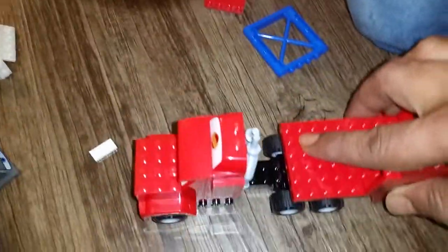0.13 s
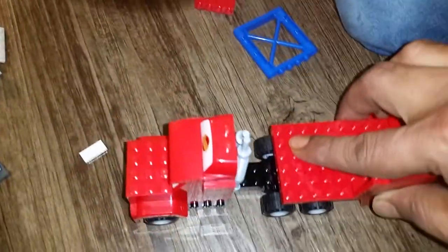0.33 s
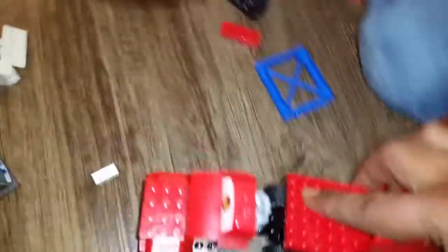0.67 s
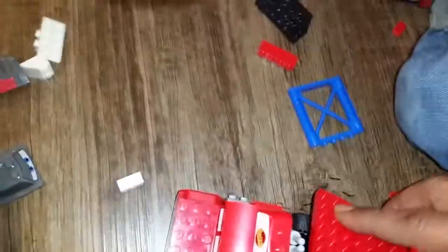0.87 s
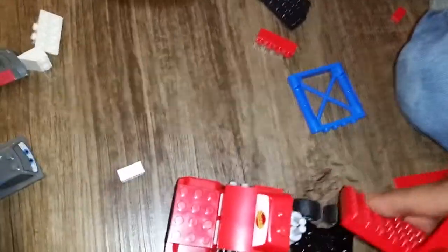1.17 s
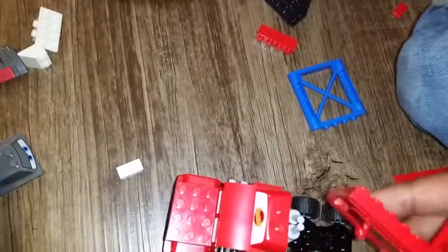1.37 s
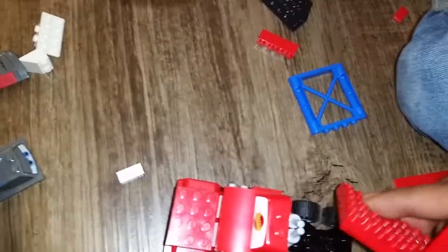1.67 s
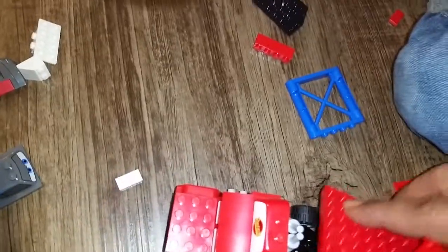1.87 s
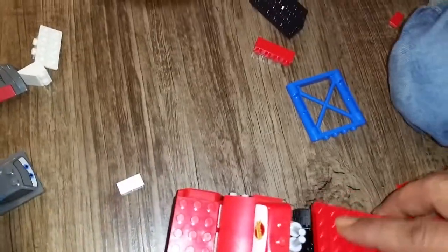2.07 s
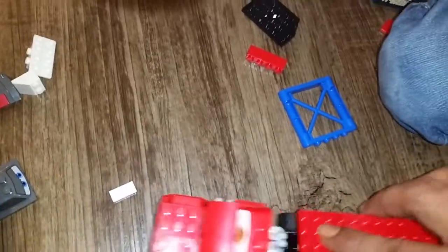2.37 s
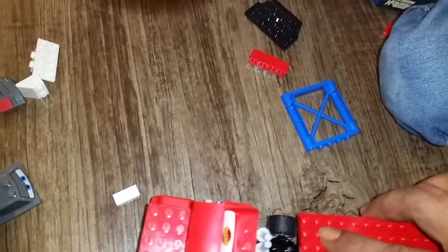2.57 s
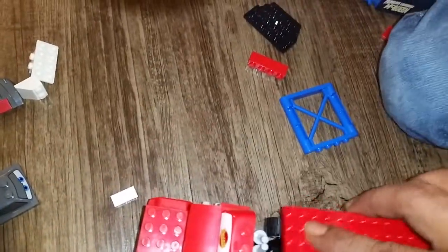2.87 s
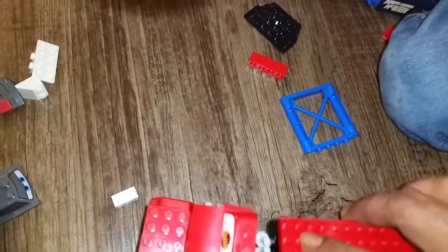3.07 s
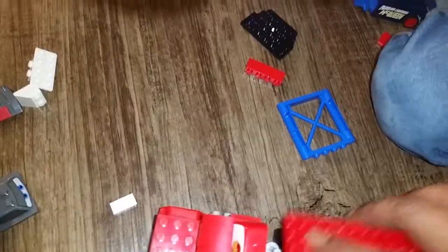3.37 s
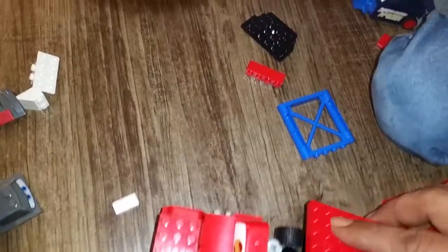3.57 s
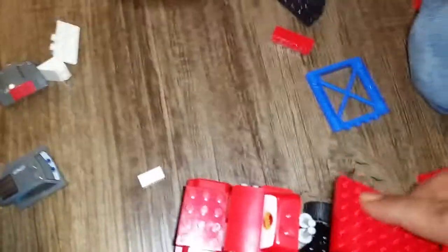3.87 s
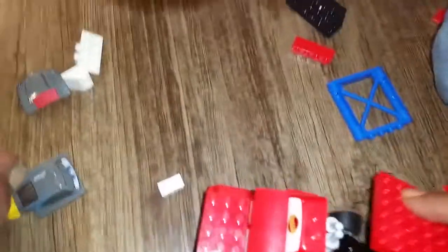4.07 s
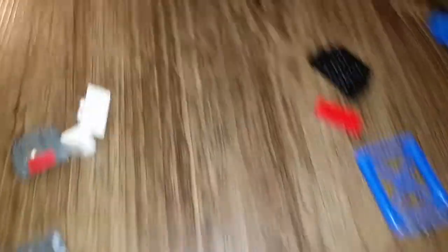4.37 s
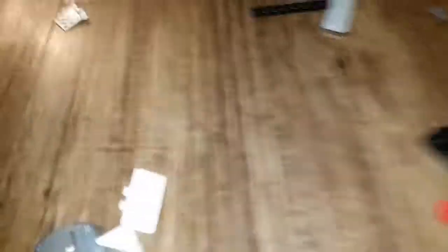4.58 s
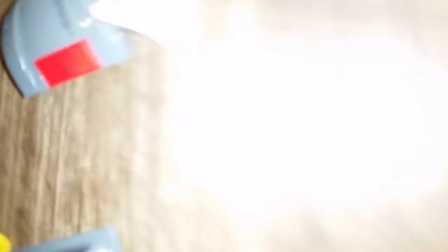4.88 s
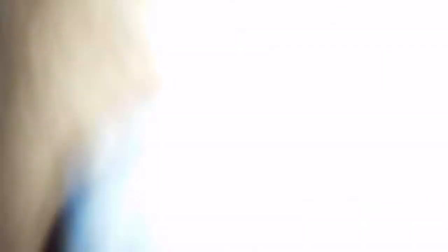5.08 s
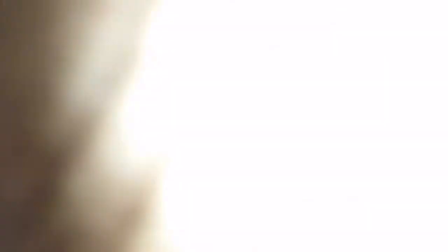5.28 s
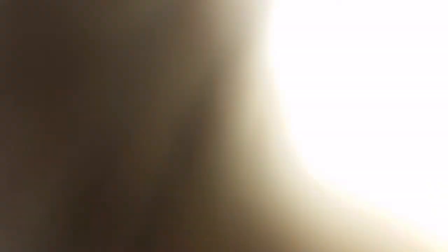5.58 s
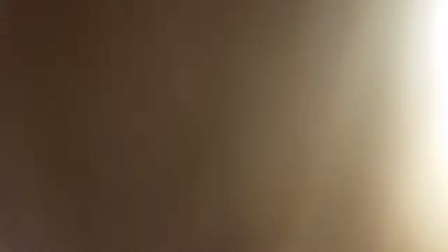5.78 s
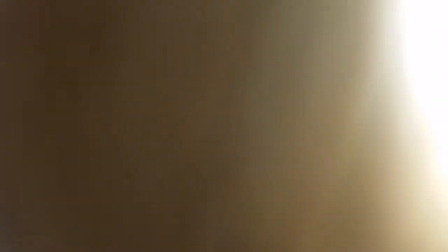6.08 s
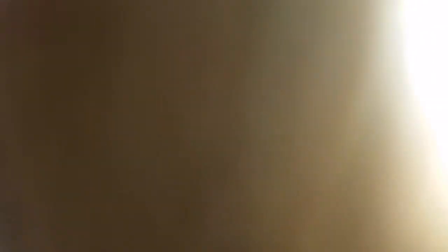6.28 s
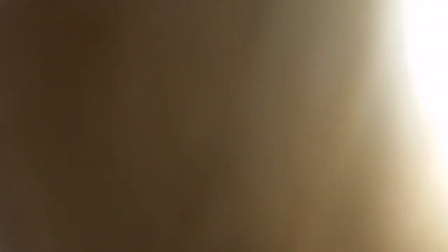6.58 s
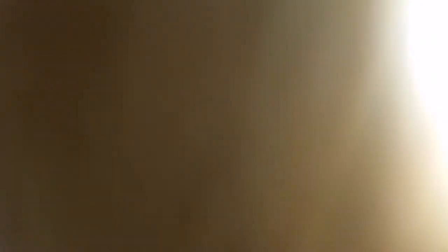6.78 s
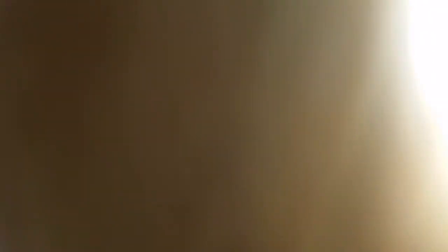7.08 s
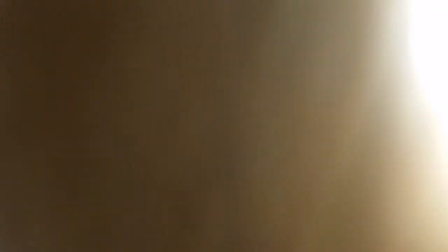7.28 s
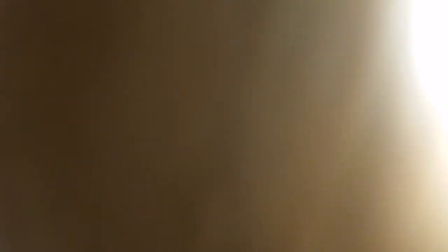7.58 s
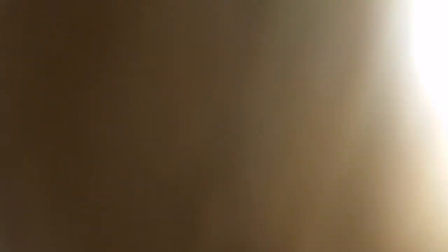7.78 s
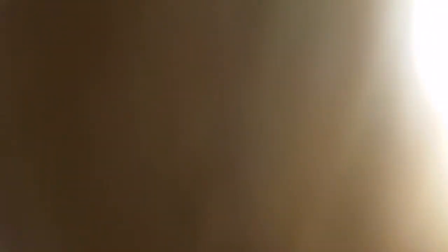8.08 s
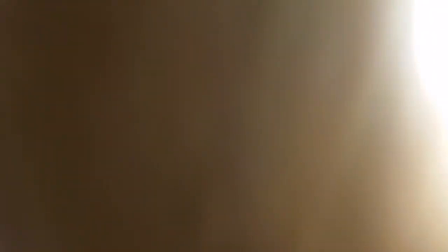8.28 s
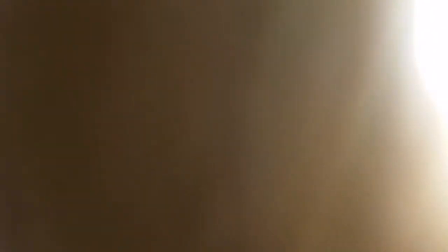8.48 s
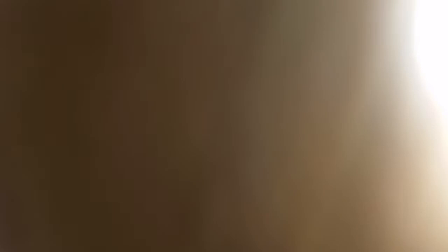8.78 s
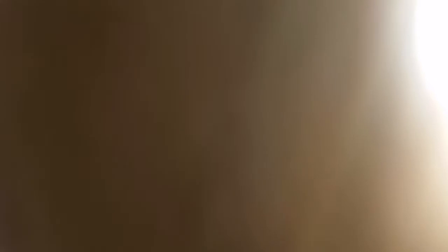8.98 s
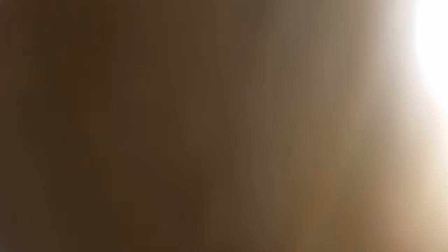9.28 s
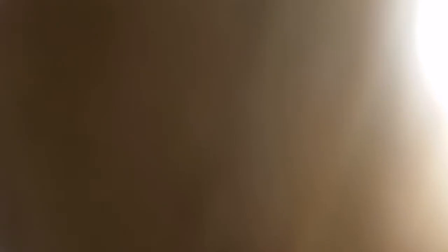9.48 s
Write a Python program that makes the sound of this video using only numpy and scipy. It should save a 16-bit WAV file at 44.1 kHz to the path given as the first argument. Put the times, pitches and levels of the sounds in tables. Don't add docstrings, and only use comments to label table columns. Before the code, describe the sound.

Hollow plastic clacks and a bright tinkling part, a huge close thump with bouncing, a muffled lull, then a dense rattle of small bricks.

```python
import sys
import numpy as np
from scipy import signal
from scipy.fft import rfft, irfft, next_fast_len
from scipy.io import wavfile
from scipy.ndimage import uniform_filter1d

SR = 44100
rng = np.random.default_rng(int(sys.argv[2]) if len(sys.argv) > 2 else 0)


def amplitude_ratio(level_db):
    exponent = np.asarray(level_db, float) / 20
    return 10 ** exponent


def transcribe(u):
    v = np.clip(np.atleast_2d(u).T, -1, 1)
    q = np.round(v * 32767).astype(np.int16)
    wavfile.write(sys.argv[1], SR, q)


N = 425124
T = np.arange(int(0.3 * SR)) / SR

# t/s, gain/dB
GAIN = [
    (5.2, 2),
    (5.23, -4),
    (5.6, -15.5),
    (6.0, -13),
    (6.5, -18),
    (6.95, -10.5),
    (7.1, -2),
    (7.5, 1),
    (7.9, 2),
]


def level(x, db):
    return x * amplitude_ratio(db) / np.sqrt(np.mean(x ** 2))


def along(table):
    s, *columns = np.transpose(table)
    return [np.interp(np.arange(N) / SR, s, c) for c in columns]


def walk(rate):
    k = int(SR / rate)
    held = rng.standard_normal(1000)[np.arange(N) // k]
    return 2.75 * uniform_filter1d(uniform_filter1d(held, k), k)


def panned(pan_db):
    return amplitude_ratio(np.array([[pan_db], [-pan_db]]) / 2)


def band(x, hz, width_hz):
    edges = np.clip([hz - width_hz / 2, hz + width_hz / 2], 15, 18000)
    return signal.sosfilt(signal.butter(2, edges, "bandpass", fs=SR, output="sos"), x)


def coloured(points, alike):
    top_hz = 14550
    hz, db = np.transpose(points)
    f = np.maximum(np.fft.rfftfreq(N, 1 / SR), 1)
    shape = amplitude_ratio(np.interp(np.log(f), np.log(hz), db, left=-90, right=-90)) * (f < top_hz)
    mid, side = irfft(rfft(rng.standard_normal((2, N))) * shape, N)
    sides = side * np.array([[1], [-1]])
    return level(np.sqrt(1 + alike) * mid + np.sqrt(1 - alike) * sides, 0)


def ring(hz, db, t60):
    t60 = max(t60, 0.003)
    t = T[:int(1.5 * t60 * SR)]
    tone = amplitude_ratio(db) * np.sin(2 * np.pi * hz * t) * np.exp(-np.log(1000) * t / t60)
    return np.pad(tone, (0, len(T) - len(t)))


def add(out, s, sound, db, pan_db, lag_s):
    sound = np.ones((2, 1)) * sound * amplitude_ratio(db) / np.max(np.abs(sound))
    for ear, sign in enumerate((1, -1)):
        i = int((s + lag_s * (1 - ear)) * SR)
        out[ear, i:i + len(T)] += (sound[ear] * amplitude_ratio(sign * pan_db / 2))[:N - i]


def chatter(sound, length_s):
    noise = rng.standard_normal(len(T))
    blows = noise * (np.abs(noise) > 2.4) * np.exp(-T / length_s) / 4
    blows[0] = 1
    return signal.fftconvolve(sound, blows[:int(6 * length_s * SR) + 1])[:len(T)]


def clicks(table, t60, up_lift_db, crowd_db, crack_db, crack_hz, crack_s, chatter_s, lag_s, trim_db, rise_s):
    out = np.zeros((2, N))
    for s, db, low_hz, up_hz, up_db, pan_db in table:
        up_db = up_db + up_lift_db
        up_hz = up_hz * (1 + 0.027 * rng.standard_normal())
        sound = ring(low_hz, 0, t60) + ring(up_hz, up_db, 0.79 * t60)
        for k in range(8):
            near_hz = (low_hz, up_hz)[k % 2] * np.exp(0.23 * rng.standard_normal())
            near_db = crowd_db + up_db * (k % 2) + 3 * rng.standard_normal()
            sound = sound + ring(min(near_hz, 16000), near_db, 0.49 * t60)
        grit = band(rng.standard_normal(len(T)), crack_hz, 1.4 * crack_hz)
        sound = sound + amplitude_ratio(crack_db) * grit * np.exp(-T / crack_s)
        sound = chatter(sound, chatter_s) * (1 - np.exp(-(T / rise_s) ** 2))
        add(out, s - rise_s / 2, sound, db + trim_db, pan_db, lag_s)
    return out


def taps(table, modes, crack_db, crack_hz, vary_db, trim_db, pan_db):
    out = np.zeros((2, N))
    for s, db in table:
        sound = sum(ring(hz, mode_db + vary_db * rng.standard_normal(), t60) for hz, mode_db, t60 in modes)
        grit = band(band(rng.standard_normal(len(T)), crack_hz, 5000), crack_hz, 5000)
        sound = sound + amplitude_ratio(crack_db) * grit * np.exp(-T / 0.0013)
        add(out, s, sound, db + trim_db, pan_db, 0.0004)
    return out


def rubs(table, pan_db):
    out, t = np.zeros((2, N)), np.arange(N) / SR
    noise = rng.standard_normal((2, N))
    for s, length_s, hz, width_hz, db in table:
        i = np.abs(t - s) < length_s
        swell = np.exp(-(2 * (t[i] - s) / length_s) ** 2)
        friction = band(band(noise[:, i], hz, 1.4 * width_hz), hz, 1.4 * width_hz)
        out[:, i] += level(friction, db) * swell
    return out * panned(pan_db)


def thumps(table, panel_t60, case_db, rebound_db, side_t60):
    out = np.zeros((2, N))
    for s, db, hz, pan_db in table:
        push = np.exp(-((T * hz - 0.2) / 0.071) ** 2)
        panel = ring(hz, 0, panel_t60) + ring(267, -1.5, 0.034)
        case = ring(387, -0.5, 0.019) + ring(490, -6.5, 0.015) + ring(700, -5, 0.015) + ring(1000, -5.5, 0.02)
        body = -signal.fftconvolve(panel + amplitude_ratio(case_db) * case, push / push.sum())[:len(T)]
        rebound = amplitude_ratio(rebound_db) * np.exp(-((T * hz - 0.62) / 0.14) ** 2)
        add(out, s - 0.001, body + rebound, db, pan_db, 0.0003)
        add(out, s, ring(1.2 * hz, 0, side_t60) * np.array([[1], [-1]]), db - 8.5, 0, 0)
    return signal.sosfilt(signal.butter(2, 75, "highpass", fs=SR, output="sos"), out)


def hum():
    # f/Hz, level/dB
    line_table = [(96.9, -59), (118.4, -54), (166.9, -52), (629.8, -64.5), (1080, -68)]
    # f/Hz, density/dB per Hz
    rumble_colour = [(12, -51), (20, -17), (70, -6), (108, -7), (140, -3.5), (168, -1), (291, -2.5),
                     (420, -12), (552, -11.5), (640, -9.5), (727, -15), (1310, -21.5), (1600, -51.5),
                     (2080, -132), (3520, -120)]
    rumble_db = -47
    t = np.arange(N) / SR
    lines = 0
    for hz, db in line_table:
        wobble = np.sin(2 * np.pi * (hz * t + 0.13 * walk(3)))
        lines = lines + amplitude_ratio(db + 2.0 + 0.42 * walk(4.8)) * wobble
    rumble = coloured(rumble_colour, 0.77) * amplitude_ratio(rumble_db - 1.0 + 1.07 * walk(3.018))
    return (lines + rumble) * amplitude_ratio(np.array([[-0.7], [0.7]]) + along(GAIN)[0])


def rustle():
    # t/s, rustle level/dB
    motion = [(0, -48.5), (.3, -47.5), (.96, -53), (1.2, -48), (2.1, -47), (2.45, -48.5), (3.4, -46.5),
              (3.78, -47), (4.2, -47), (4.67, -51), (5.1, -48), (7.1, -48.5), (7.22, -43), (7.6, -43),
              (8.1, -48), (8.78, -49.5), (9.05, -50), (9.64, -50)]
    # f/Hz, density/dB per Hz
    soft_colour = [(410, -5), (700, -4), (1180, -0.5), (1330, -1), (1700, 0), (3480, 5), (5500, -19.5),
                   (7150, -40.5), (12100, -120)]
    crisp_colour = [(1760, -9), (3000, -3), (3490, -7), (4010, -1), (7420, -1.5), (9000, -6.5),
                    (11700, -90), (19800, -120)]
    air_colour = [(5290, -5), (9000, -2.5), (10200, -0.5), (14300, -0.5)]
    soft_sink, air_sink = 0.3, 2.2
    gain_db = along(GAIN)[0]
    lowered_db = np.minimum(gain_db, 0)
    busy_db = along(motion)[0] + gain_db
    pan_db = -9.5 * np.array([[0.5], [-0.5]])

    soft_db = busy_db - 0.43 + soft_sink * lowered_db + walk(21) + 0.5 * walk(3.4)
    soft = coloured(soft_colour, 0.014) * amplitude_ratio(soft_db + np.array([[1.1], [-1.1]]))
    crisp = coloured(crisp_colour, 0.046) * amplitude_ratio(busy_db + 0.27 + walk(25) + pan_db)
    air_db = 0.6 * busy_db - 22.5 + air_sink * lowered_db + 0.27 * walk(35)
    air = coloured(air_colour, 0.03) * amplitude_ratio(air_db + 0.16 * pan_db)
    return soft + crisp + air


def cloth_rubs():
    strokes = [(1.31, 0.1, 2900, 2500, -43), (1.62, 0.21, 684, 266, -44.5), (1.62, 0.36, 5900, 6750, -39.5),
               (2.242, 0.12, 8250, 2040, -34.5), (2.66, 0.38, 2310, 2470, -41),
               (3.764, 0.1, 6900, 4500, -43), (4.17, 0.17, 3370, 2480, -44.5),
               (5.095, 0.19, 7000, 7740, -37), (6.12, 0.11, 5460, 3000, -52), (6.74, 0.12, 6000, 5000, -68),
               (7.955, 0.1, 3120, 2390, -36.5), (8.78, 0.48, 3670, 5360, -40.5),
               (9.384, 0.13, 5570, 2500, -44)]
    return rubs(strokes, pan_db=-6)


def grips():
    holds = [
        (4.6, 0.96, 40, 43, -52),
        (5.41, 0.17, 220, 248, -40),
        (5.46, 0.043, 497, 503, -43),
        (5.65, 0.21, 200, 286, -37),
        (5.897, 0.014, 510, 217, -21.5),
        (6.01, 0.12, 69, 89, -46),
    ]
    return rubs(holds, pan_db=6)


def cracks():
    # t/s, peak/dB, treble/dB re peak, left minus right/dB, body f/Hz
    contacts = [(5.207, -2, -4, -17, 1200), (5.28, -36, -25, -14, 1500), (5.361, -16, 4, 13.5, 1720),
                (5.429, -27.5, -17, 9, 900), (5.4435, -12.5, -24, 13.5, 770), (5.602, -37.5, 6, 9, 900),
                (5.66, -28, -13, 16, 890), (5.6696, -8, 0.5, 12.5, 1260), (5.6727, -13.5, 7.5, 8.5, 1950),
                (5.691, -22, -13, 13.5, 1290), (5.714, -14, 1, 13, 1190), (5.7225, -22.5, 4, 13, 1200),
                (5.7337, -14.5, -5, 16, 1480), (5.74, -23, -12, 16, 1500), (5.7438, -18, -7, 17, 1080),
                (5.81, -21, -5, 15.5, 910), (5.827, -29, -18, 16, 700), (5.861, -29, -2, 14, 1600),
                (5.882, -17.5, -3, 13, 1230), (5.8874, -20, -7, 11, 700), (5.922, -35, -10, 13, 1090)]
    out = np.zeros((2, N))
    for s, db, top_db, pan_db, hz in contacts:
        dull, bright = rng.standard_normal((2, len(T)))
        body = band(dull * np.exp(-(T / 0.0028) ** 2), hz, 1.03 * hz)
        edge = amplitude_ratio(top_db - 14.5) * band(bright * np.exp(-(T / 0.002) ** 2), 3800, 2600)
        spark = amplitude_ratio(top_db - 20) * band(bright * np.exp(-(T / 0.0018) ** 2), 8000, 3500)
        add(out, s, body + edge + spark, db, pan_db, 0.0003)
    return out


def landing():
    # t/s, peak/dB, f/Hz, left minus right/dB
    slam = [
        (5.2075, 12.5, 167, -0.5),
    ]
    # t/s, peak/dB, f/Hz, left minus right/dB
    floor_thumps = [(4.267, -34, 101, 17), (4.431, -44, 175, 33), (4.651, -27, 101, 18), (5.222, -4, 172, 3.5),
                    (5.239, -5, 183, 4.5), (5.256, -5.5, 201, 1.5), (5.28, -6, 229, 2.5),
                    (5.293, -13, 207, -2.5), (5.324, -27, 210, 0), (5.3605, -14.5, 153, -1),
                    (5.3655, -5.5, 168, -2), (5.429, -20.5, 121, -19), (5.444, -18, 234, 21),
                    (5.47, -21.5, 133, 9), (5.553, -33.5, 222, 29), (5.61, -37, 198, 18),
                    (5.717, -19, 128, 34.5), (5.726, -10.5, 295, 20), (5.732, -11.5, 320, 23.5),
                    (5.74, -9, 170, 18.5), (5.758, -21.5, 232, 19), (5.811, -12, 157, 28), (5.826, -18, 129, 32),
                    (5.844, -15.5, 100, 8), (5.864, -10.5, 103.6, 13), (5.882, -19, 198, 11),
                    (5.888, -17, 302, 13), (5.898, -21, 150, 12), (5.917, -24.5, 152, 17),
                    (5.939, -21.5, 98, 12), (8.751, -24, 377, 2), (8.844, -28.5, 310, 4)]
    out = thumps(slam, panel_t60=0.035, case_db=3.5, rebound_db=-8.5, side_t60=0.032)
    return out + thumps(floor_thumps, panel_t60=0.088, case_db=-1.5, rebound_db=-2.0, side_t60=0.1)


def case_ticks():
    # t/s, peak/dB
    touches = [
        (5.7631, -13),
        (5.7847, -20.5),
        (5.789, -24.5),
        (5.798, -30),
        (5.8025, -29),
    ]
    # f/Hz, level/dB, t60/s
    modes = [(2495, -3.5, 0.057), (3750, -3, 0.037), (4640, -23, 0.031), (5760, -6.5, 0.029),
             (6350, -13, 0.028), (6971, -23, 0.023), (7547, -7, 0.026), (9700, -11.5, 0.011)]
    return taps(touches, modes, crack_db=3, crack_hz=6000, vary_db=2.5, trim_db=-4, pan_db=9)


def bead():
    # t/s, peak/dB
    touches = [(6.5485, -46.5), (6.5984, -40), (6.6238, -38), (6.6357, -42), (6.665, -44), (6.6735, -41.5),
               (6.7057, -36), (6.7463, -41.5), (6.7674, -39.5), (6.7323, -55), (6.779, -51), (6.7914, -44),
               (6.8536, -55)]
    # f/Hz, level/dB, t60/s
    modes = [(5430, 0, .022), (5480, -25, .35), (7800, -14, .05), (10150, -28, .03), (12800, -32, .04)]
    return taps(touches, modes, crack_db=3, crack_hz=5000, vary_db=1, trim_db=2.5, pan_db=-17)


def released_plate():
    # t/s, peak/dB
    touches = [
        (6.13, -52),
        (6.162, -50),
    ]
    # f/Hz, level/dB, t60/s
    modes = [(2774, -2, .45), (7610, -3, .25)]
    return taps(touches, modes, crack_db=-3, crack_hz=5000, vary_db=5.0, trim_db=-0.5, pan_db=-7)


def ticks():
    # t/s, peak/dB, main f/Hz, upper f/Hz, upper level/dB re main
    touches = [(3.475, -18, 4200, 6200, -8), (3.498, -16.5, 4200, 6140, -5),
               (4.9727, -15.5, 3950, 7100, 26), (5.0584, -8.5, 2860, 8000, 5),
               (5.335, -21.5, 3440, 7530, 1), (5.8452, -24, 4360, 7700, -15), (5.899, -32, 4340, 7800, -2),
               (6.043, -39, 3010, 5330, -11), (6.062, -30, 3240, 7450, -9),
               (6.0823, -25.5, 2350, 7340, -20), (6.116, -38, 5500, 10000, -14),
               (6.13, -33.5, 5550, 8000, -13), (6.1615, -33, 2790, 7610, -8.5),
               (8.5997, -15.5, 4190, 6520, 8)]
    rows = [(*row, -10) for row in touches]
    return clicks(rows, t60=0.028, up_lift_db=8.5, crowd_db=-5.5, crack_db=3, crack_hz=5500, crack_s=0.0012,
                  chatter_s=0.0042, lag_s=0.0003, trim_db=-4.0, rise_s=0.0003)


def scrapes():
    drags = [(2.623, 0.041, -29, 1640, 6), (3.183, 0.1, -26, 2280, 8), (2.17, .04, -27, 1800, 3),
             (3.47, 0.087, -35, 1180, 5), (5.69, 0.03, -32, 1500, 14), (5.712, 0.042, -26, 1750, 13),
             (2.471, 0.061, -34.5, 2560, 15), (4.41, 0.14, -47, 2240, 17.5), (6.012, 0.049, -44, 1900, -6),
             (6.04, 0.095, -38, 2300, -6), (6.1, 0.11, -43, 2640, -11), (.842, 0.047, -42, 2430, 12)]
    out = np.zeros((2, N))
    slips = (rng.random(N) < 2200 / SR) * rng.standard_normal(N) + 0.031 * rng.standard_normal(N)
    for s, length_s, db, hz, pan_db in drags:
        i = np.arange(int(s * SR), int((s + length_s) * SR))
        body = ring(hz, 0, 0.011) + ring(1.25 * hz, -1.2, 0.0048)
        body = body + ring(2320, -18, 0.03) + ring(2800, -24, 0.08) + ring(2960, -11.5, 0.0084)
        swell_db = np.interp(np.linspace(0, 1, len(i)), [0, 0.34, 1], [-12, 0, -13])
        sound = signal.fftconvolve(slips[i] * amplitude_ratio(swell_db), body)
        sound = sound * amplitude_ratio(db + 8.5) / np.max(np.abs(sound))
        out[:, i[0]:i[0] + len(sound)] += sound * panned(pan_db)
    return out


def crackle():
    busy = np.interp(np.arange(N) / SR, [7.03, 7.05, 7.2, 7.5, 7.75], [0.0, 0.7, 0.0, 0.84, 0.0])
    tap_db = np.minimum(3.5 * rng.exponential(size=N), 7)
    contacts = (rng.random(N) < 450 / SR) * amplitude_ratio(tap_db) * busy
    grain = rng.standard_normal(len(T)) * np.exp(-T / 0.00069)
    grain = grain + ring(7800, -2, 0.012) + ring(6150, -3, 0.008) + ring(1750, -12, 0.02)
    return signal.fftconvolve(contacts, grain)[:N] * amplitude_ratio(np.array([[-54], [-40]]))


def loose_bits():
    # t/s, peak/dB, main f/Hz, upper level/dB re main
    rattle = [(7.043, -22, 6870.0, -13), (7.046, -20, 6140, -9.4), (7.0504, -19, 6100, -13),
              (7.0926, -19, 6000, -2.1), (7.1736, -21, 6140.0, -13), (7.1857, -16, 5470.0, -7),
              (7.1899, -12.9, 6090.0, 3.2), (7.1951, -10.6, 7200, 13), (7.2005, -14, 7200, 9),
              (7.2106, -17, 7060.0, 3), (7.232, -17, 3360.0, 2.4), (7.2383, -13, 5500, 4),
              (7.2464, -21.2, 3700, 1), (7.2516, -17, 3140.0, 8), (7.2823, -16, 5860, -2.6),
              (7.2907, -11, 6850.0, 20), (7.3037, -24, 3250, 3), (7.3131, -14, 7000, -7),
              (7.349, -18.9, 4220, -11), (7.3586, -24.5, 2560, -5), (7.3772, -19, 5450.0, -0.9),
              (7.3844, -15, 5550, -0.9), (7.4132, -19, 4220.0, -7), (7.4164, -16, 3840, -4.7),
              (7.4198, -4.5, 5800, 4.0), (7.4254, -9.5, 7080.0, 16), (7.4441, -24, 7040, 1.5),
              (7.4539, -22, 4370.0, -6.7), (7.4623, -12, 5430, -13.0), (7.4666, -13.5, 4800.0, -14),
              (7.4718, -15, 4670, -4), (7.4796, -9.5, 5430.0, -9.7), (7.4871, -19, 4830, -27),
              (7.493, -26, 4760.0, -4), (7.511, -17, 5470.0, -5.5), (7.5141, -8, 4400, 2.5),
              (7.5343, -23.5, 3290.0, -6.3), (7.539, -19.2, 3500, -1.3), (7.5426, -21, 6290.0, -6.8),
              (7.548, -12.5, 6140, -5), (7.559, -18, 5170.0, -2), (7.5807, -22, 3530.0, -6.8),
              (7.593, -14.5, 3750, -8), (7.5957, -18, 3640, -2), (7.6001, -19.5, 4170, -8),
              (7.6156, -21, 3840, -2), (7.6298, -23, 2560.0, -2), (7.65, -15.5, 6120.0, -2),
              (7.6646, -19, 4640, -5.9), (7.6882, -22, 6220.0, -17)]
    up_hz, pan_db = 7810, -14
    rows = [(s, db, hz, up_hz, up_db, pan_db) for s, db, hz, up_db in rattle]
    return clicks(rows, t60=0.013, up_lift_db=0.0, crowd_db=-13, crack_db=5, crack_hz=7000, crack_s=0.0006,
                  chatter_s=0.0035, lag_s=0.0004, trim_db=-2.5, rise_s=0.0002)


def chimes():
    # t/s, peak/dB, low note/dB re peak, top notes/dB re peak, left minus right/dB
    strikes = [
        (2.554, -23, -17.5, -27, -15.5),
        (2.6924, -33.5, -6, 1, -10.5),
        (2.7093, -21.5, -12, -11, -4.5),
        (2.7681, -20.5, -16, -9.5, 9.5),
        (2.8378, -6.5, -43, -25, -1),
        (2.8606, -10, -22.5, 18, -6),
        (2.8704, -12.5, -22, -5.5, -13),
        (2.9385, -11.5, -14, 6, -6),
        (2.9445, -27, -15, 8, -7),
        (2.983, -26, -15, 5.5, -8),
    ]
    # f/Hz, level/dB, t60/s
    modes = [(2250, -2.5, 0.11), (4715, 4.5, 0.029), (5280, -7, 0.17), (6700, -15.5, 0.077),
             (6740, -9.5, 0.03), (8250, -17.5, 0.045), (9520, -16, 0.035), (13700, -21, .025)]
    out = np.zeros((2, N))
    for s, db, low_db, top_db, pan_db in strikes:
        noise = rng.standard_normal((len(modes), len(T)))
        sound = amplitude_ratio(8) * band(noise[0], 6000, 10000) * np.exp(-T / 0.0035)
        for (hz, mode_db, t60), n in zip(modes, noise):
            mode_db = mode_db + 2.5 * rng.standard_normal()
            if hz < 3000:
                mode_db += low_db + 24.0
            elif hz > 6000:
                mode_db += top_db + 26.5
            steady, depth, smooth = (0.65, 0.25, 500) if hz < 6000 else (0.15, 0.55, 70)
            flutter = steady + depth * level(uniform_filter1d(n, smooth), 0)
            hz = hz * (1 + 0.00346 * rng.standard_normal())
            sound += ring(hz, mode_db, t60) + ring(hz, mode_db - 9.0, 5 * t60) * flutter
        add(out, s, sound, db + 4.5, pan_db, 0.0004)
    return out


def plates():
    # t/s, peak/dB, main f/Hz, upper level/dB re main
    front = [(0.244, -32, 1380, -45), (0.712, -34, 1200, -29), (0.743, -37, 1080, -36),
             (0.763, -20.5, 1110, -12.5), (0.804, -34.5, 1160, -32), (1.061, -36, 1090, -24),
             (2.155, -10.5, 1390, 2), (2.174, -13, 1530, -20), (2.454, -23.5, 1160, -6),
             (2.63, -19, 1180, -9), (2.657, -25, 1180, -7.5), (2.984, -27.5, 1320, -12),
             (3.043, -25, 1140, 1), (3.081, -31.5, 1190, -48), (3.19, -17.5, 1840, -6),
             (3.367, -28.5, 1490, -10), (3.632, -36, 1550, -28), (3.683, -13, 1620, -13),
             (3.978, -22.5, 1660, -5), (7.758, -25, 1220, -6), (8.751, -15.5, 1040, -29),
             (0.7615, -17, 1600, -14), (0.775, -32, 1090, -30), (3.684, -17, 1406, -20),
             (3.979, -23.5, 1450, -28)]
    # t/s, peak/dB, main f/Hz, upper level/dB re main
    left = [
        (0.849, -42.5, 1070, 3),
        (0.864, -40, 1170, 8),
        (3.057, -27.5, 1150, 26),
        (3.205, -22.5, 1200, 23),
        (3.2262, -29, 1300, 18),
        (3.246, -27.5, 1800, 22),
        (3.2625, -33, 3000, 4.5),
        (3.418, -31.5, 1690, -8),
    ]
    rows = [(s, db, hz, 2222, up_db, 2) for s, db, hz, up_db in front]
    rows += [(s, db, hz, 2310, up_db, 23.5) for s, db, hz, up_db in left]
    return clicks(rows, t60=0.017, up_lift_db=13.0, crowd_db=-12.5, crack_db=0.0, crack_hz=2270, crack_s=0.0064,
                  chatter_s=0.0045, lag_s=0.0001, trim_db=4.0, rise_s=0.002)


def room(x):
    t60_s, wet_db = 0.25, -18
    t = np.arange(int(0.4 * SR)) / SR
    tail = rng.standard_normal((2, len(t))) * 1000.0 ** (-t / t60_s) * (t > 0.004)
    tail = signal.lfilter([1], [1, -0.3], tail)
    tail = tail / np.sqrt(np.sum(tail ** 2, axis=1, keepdims=True))
    return amplitude_ratio(wet_db) * signal.fftconvolve(x.mean(axis=0, keepdims=True), tail, axes=1)[:, :N]


def ports(x):
    # f/Hz, level/dB
    response = [(8700, 0), (9800, -9), (11000, -5.5), (13000, -1), (14400, -3), (14900, -16), (16000, -26)]
    hz, db = np.transpose(response)
    size = next_fast_len(N)
    gain = amplitude_ratio(np.interp(np.fft.rfftfreq(size, 1 / SR), hz, db))
    return irfft(rfft(x, size) * gain, size)[:, :N]


def scene():
    hits = plates() + chimes() + loose_bits() + ticks() + crackle()
    hits = hits + bead() + case_ticks() + released_plate() + band(scrapes(), 3600, 6000)
    hits = signal.sosfilt(signal.butter(3, 750, "highpass", fs=SR, output="sos"), hits)
    near = ports(hits + room(hits) + cracks() + cloth_rubs())
    return near + landing() + rustle() + grips() + hum()


def top_cut(x):
    return signal.sosfilt(signal.butter(12, 15870, fs=SR, output="sos"), x)


def record(dry):
    dulled = signal.sosfilt(signal.butter(8, 15900, fs=SR, output="sos"), dry)
    mix = np.clip(dulled, -0.93, 0.93)
    return top_cut(mix)


dry = scene()
out = record(dry)
transcribe(out)
```